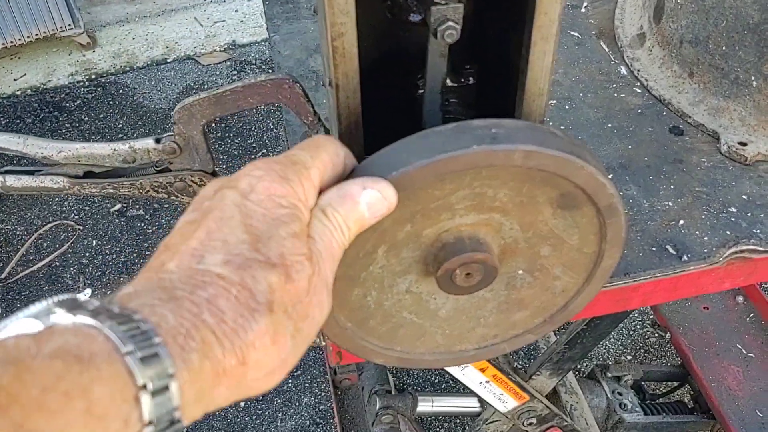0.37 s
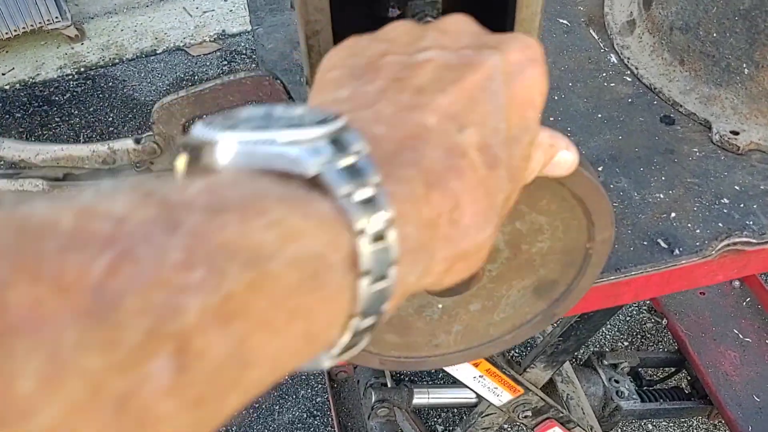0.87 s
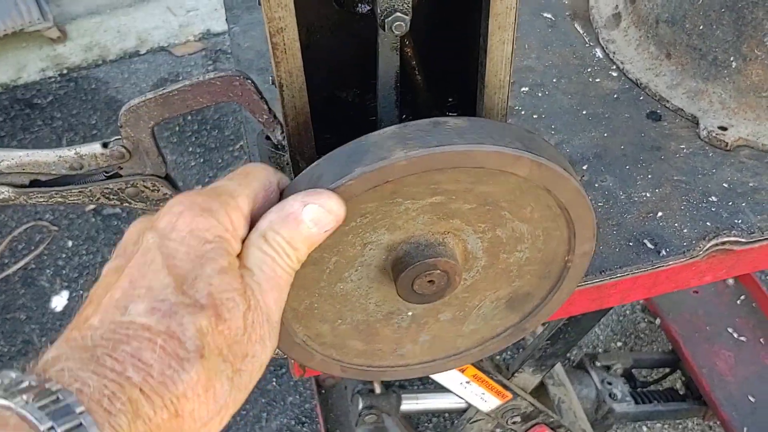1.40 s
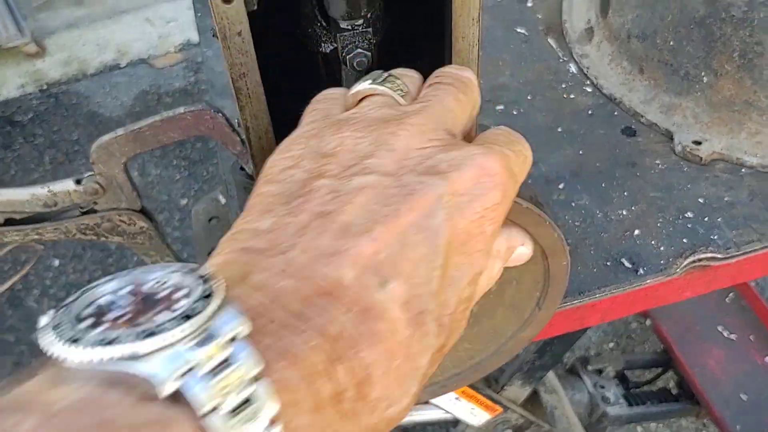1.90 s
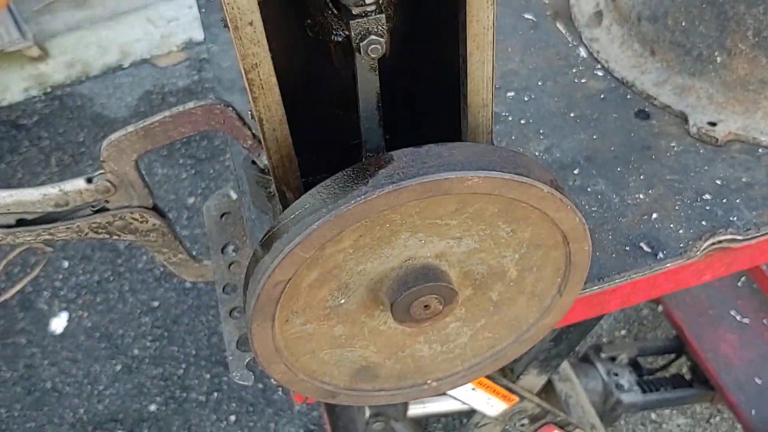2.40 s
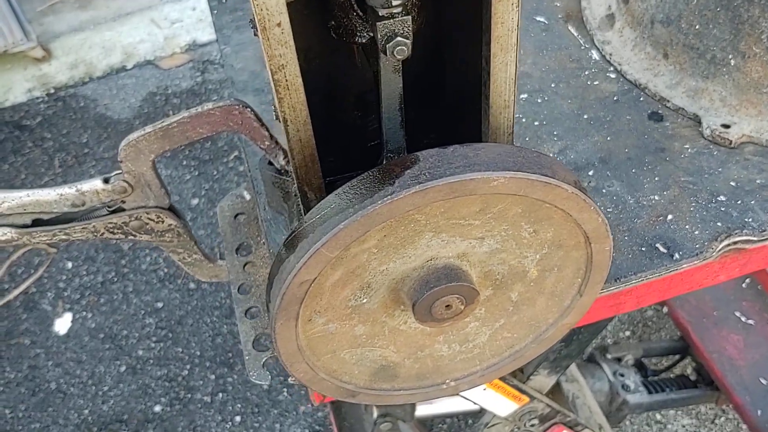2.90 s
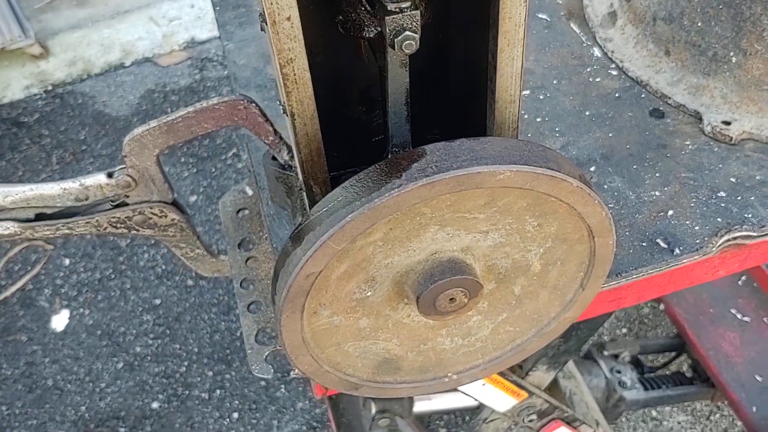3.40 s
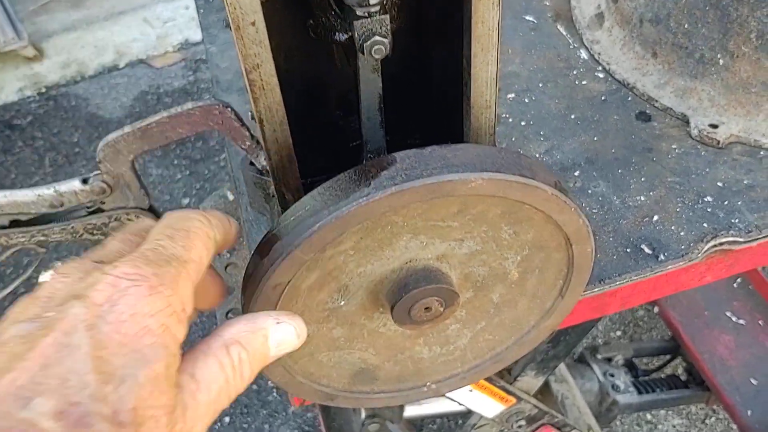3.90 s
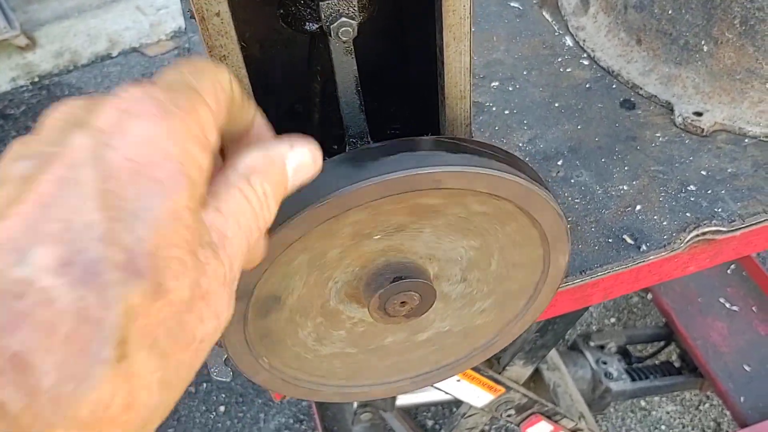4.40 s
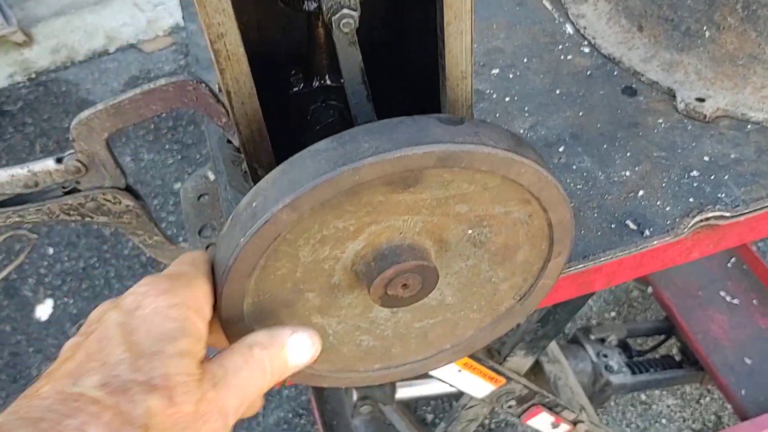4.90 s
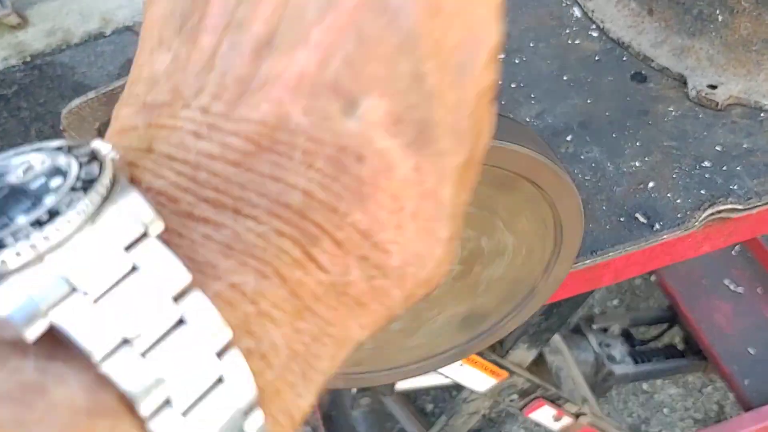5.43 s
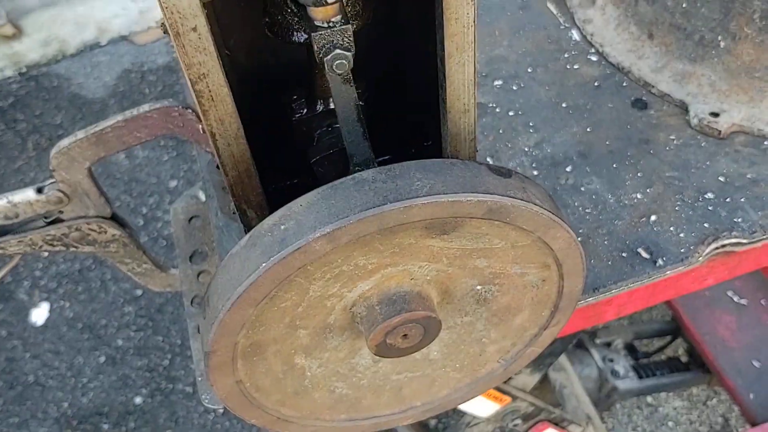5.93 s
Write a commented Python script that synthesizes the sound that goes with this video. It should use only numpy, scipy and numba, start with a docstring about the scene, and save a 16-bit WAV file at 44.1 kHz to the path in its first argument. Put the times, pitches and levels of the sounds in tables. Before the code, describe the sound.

Close up in an outdoor yard, a small piston engine leaks compressed air: a bright, thin, very high hiss runs throughout, fluttering slightly and swelling or easing as a hand rocks the flywheel. A faint, low machine hum and distant yard rumble sit far beneath. At about 1.6 s there is a short hollow tap. The hiss dips near 2.4 s, then little puffs come at 2.45, 2.6 and 2.8 s, with a soft dull bump. From 2.8 to 3.15 s the leak narrows into a breathy whistle. Around 3.18 s a thin squeal and sharp loud spit burst out with clustered linkage knocks and a tick. Air gushes from 3.3 to 3.57 s, its pitch sinking, followed by two quick puffs by 3.7 s. Steady hiss returns. Around 5.43 to 5.55 s come light knocks and a weaker squealing spit, then hiss surges briefly at 5.74 s and continues to 6 s.

```python
"""Outdoor yard: compressed air leaks from a small piston engine while a hand rocks its flywheel.
Jets are noise through resonances: steady leaks follow the valve flow; whistle and gush have a moving resonance.
Spits, puffs and squeals are short bursts of the same kind; knocks, taps and bumps are ringing modes.
A far machine hums as a sum of shaft orders over coloured yard noise.
The right microphone port faces the engine, the left lies in shadow."""
import sys
import numpy as np
from scipy import signal
from scipy.fft import rfft, irfft, next_fast_len
from scipy.io import wavfile
from numba import njit

SR = 44100
rng = np.random.default_rng(int(sys.argv[2]) if len(sys.argv) > 2 else 0)


def transcribe(u):
    """Save the signal u as a 16-bit wav file named by the first command-line argument.

    u: samples, shape (n,) or (channels, n), limited to [-1, 1]; the rate is SR.
    q: integer samples, one column per channel.
    """
    v = np.clip(np.atleast_2d(u).T, -1, 1)
    q = np.round(v * 32767).astype(np.int16)
    wavfile.write(sys.argv[1], SR, q)


def how_loud(loudness_db):
    """Turn decibels into a plain amplitude multiplier (0 dB gives 1, 20 dB gives 10)."""
    steps = np.asarray(loudness_db, float) / 20
    return 10 ** steps


N = 266805


def rms_one(x):
    """Scales both ports to unit rms at the right one."""
    return x / np.sqrt(np.mean(x[1] ** 2) + 1e-20)


def in_time(rows, outside=None):
    """Columns of a curve at every sample, interpolated linearly."""
    s, *columns = np.transpose(rows)
    return [np.interp(np.arange(N) / SR, s, c, outside, outside) for c in columns]


def at_hz(points, hz):
    """A spectrum read on a log-frequency axis."""
    point_hz, value = np.transpose(points)
    return np.interp(np.log(hz + 1), np.log(point_hz), value)


def drift(rate_hz):
    """Slow chance of spread 1: noise through two equal poles, made at SR / 40."""
    r = np.exp(-80 * np.pi * rate_hz / SR)
    noise = rng.standard_normal(N // 40 + 2002)
    slow = signal.lfilter([1], [1, -2 * r, r * r], noise)[2000:]
    return np.interp(np.arange(N) / 40, np.arange(len(slow)), slow / slow.std())


# Left port response. Each row: frequency in Hz, level in dB.
SHADOW = [(1000, 0.5), (1800, -1.5), (3500, -0.5), (7200, -0.5), (8600, -8), (9800, -25), (11400, -10),
          (12700, -18.5), (14100, -9), (15500, -7.5)]


def ports(x, left_db, lag_ms):
    """The left port is dulled by the housing; the right port hears a little later."""
    size = next_fast_len(N + 64)
    hz = np.fft.rfftfreq(size, 1 / SR)
    left_path = how_loud(at_hz(SHADOW, hz) + left_db)
    right_path = np.exp(-2j * np.pi * hz * lag_ms / 1000)
    return irfft(rfft(x, size) * [left_path, right_path], size)[:, :N]


# Yard spectrum. Each row: frequency in Hz, relative density in dB per Hz.
YARD = [(30, -11), (45, -15), (57, -1.5), (70, -5.5), (115, 2.2), (150, -1), (250, -1.5), (400, -4),
        (900, -7), (2000, -8.5), (3300, -3.5), (5400, -12.5), (7000, -61), (9000, -19)]
# Each row: frequency in Hz, left-right likeness from 0 to 1.
YARD_LIKENESS = [(50, 1), (160, 0.86), (400, 0.54), (1200, 0.9), (2400, 0.95), (3200, 0.97), (4500, 0.14),
                 (7000, 0.11)]
YARD_DB = -53


def yard():
    """Distant traffic and machinery: steady coloured noise, alike in both ports in the bass."""
    hz = np.fft.rfftfreq(N, 1 / SR)
    shared, own = rfft(rng.standard_normal((2, N)))
    alike = np.clip(at_hz(YARD_LIKENESS, hz), 0, 1)
    left = alike * shared + np.sqrt(1 - alike ** 2) * own
    pair = np.array([left, shared]) * how_loud(at_hz(YARD, hz))
    return how_loud(YARD_DB) * rms_one(ports(irfft(pair, N), left_db=-0.6, lag_ms=0.16))


# Far machine. Each row: time in seconds, second order in Hz, its rms in dB, brightness in dB per octave.
HUM = [(0, 166.6, -64.5, 2), (1.2, 165.6, -64, 2), (2.6, 165.3, -63.5, 1), (3.4, 165, -59.5, 1),
       (4.8, 164, -61.5, 0), (6.05, 163.4, -65, -2)]
# Each row: multiple of shaft speed, relative level in dB.
HUM_ORDERS = [(1, -8.5), (2, 0), (3, -17), (4, -5), (5, -13), (6, -7.5), (7, -19), (11.45, -17.5)]
HUM_WAVER_DB = 0.8


def hum():
    """Orders of a slowly sagging shaft speed, each wavering a little."""
    second_order_hz, level_db, bright_db = in_time(HUM)
    turns = np.cumsum(second_order_hz / 2) / SR
    out = 0
    for k, order_db in HUM_ORDERS:
        total_db = level_db + order_db + bright_db * np.log2(k / 2) + HUM_WAVER_DB * drift(1.0)
        out = out + np.sqrt(2) * how_loud(total_db) * np.sin(2 * np.pi * (k * turns + rng.random()))
    return out


def ring(s, peak_db, hz, t60_s):
    """Clicks at the given times set one damped mode ringing."""
    clicks = np.full(N, 1e-18)
    clicks[(s * SR).astype(int)] = how_loud(peak_db)
    r, w = how_loud(-60 / (t60_s * SR)), 2 * np.pi * hz / SR
    return signal.lfilter([.5, 0, -.5], [1, -2 * r * np.cos(w), r * r], clicks)


# Soft dull bumps. Each row: time in seconds, peak in dB before the band filter, mode in Hz.
BUMPS = [(2.75, -52, 556), (5.04, -63, 587), (5.63, -57, 595), (5.86, -57, 573)]
BUMP_T60_S, BUMP_CENTRE_HZ, BUMP_BAND_HZ = 0.22, 560, 250


def bumps():
    """A soft contact rings one low mode; a band filter takes off the click."""
    rings = sum(ring(np.array([s]), db, hz, BUMP_T60_S) for s, db, hz in BUMPS)
    edges_hz = [BUMP_CENTRE_HZ - BUMP_BAND_HZ / 2, BUMP_CENTRE_HZ + BUMP_BAND_HZ / 2]
    return signal.sosfilt(signal.butter(2, edges_hz, "band", fs=SR, output="sos"), rings)


# Short hollow taps of one pitch. Each row: start in seconds, envelope peak in dB, pitch in Hz.
TAPS = [(1.6291, -31.5, 1100), (1.6325, -32, 664), (1.6364, -37, 640)]
TAP_RISE_S = .0008


def taps():
    """A padded contact: a few cycles that swell and die."""
    out, since_s = np.zeros(N), np.arange(600) / SR
    swell = since_s / TAP_RISE_S * np.exp(1 - since_s / TAP_RISE_S)
    for s, db, hz in TAPS:
        out[int(s * SR):][:len(since_s)] += how_loud(db) * swell * np.sin(2 * np.pi * hz * since_s)
    return ports(np.array([out, out]), left_db=-2.5, lag_ms=0.064)


# Linkage knocks. Each row: time in seconds, strength in dB, tilt in dB per octave below 1100 Hz, thump in dB.
KNOCKS = [(1.6296, -45.5, -5, -68), (3.177, -49, -8, -66), (3.190, -44, -5, -73), (3.2012, -46, -2, -47),
          (3.2035, -47, -3, -60), (3.208, -44, 0, -75), (3.222, -53, 0, -68), (5.433, -50, 0.5, -60),
          (5.55, -48, 1, -50)]
# Frame modes. Each row: frequency in Hz, relative level in dB, t60 in seconds.
FRAME = [(483, 1, 0.044), (556, -6, 0.099), (710, 5, 0.016), (870, 3.5, 0.013), (1096, 3.5, 0.035),
         (1335, -10, 0.024), (1670, 4.5, 0.03), (2240, 2, 0.028), (2660, 9, 0.011), (3870, -2, 0.011)]
# Valve plate modes. Each row: frequency in Hz, relative level in dB, t60 in seconds.
PLATE = [(10200, -2, .012), (11400, -6, .008), (12400, 0, .012)]
THUMP_HZ, THUMP_T60_S = 115, 0.18  # the bench
TICK_S, TICK_DB = 3.1990, -12  # the valve plate snaps onto its seat


def knocks():
    """Each knock strikes the frame modes by chance strengths and thumps the bench; the plate ticks once."""
    s, strength_db, tilt_db, thump_db = np.transpose(KNOCKS)
    luck_db = rng.normal(0, 2.5, (len(s), len(FRAME)))
    out = ring(s, thump_db, THUMP_HZ, THUMP_T60_S)
    for k, (hz, mode_db, t60_s) in enumerate(FRAME):
        peak_db = strength_db + mode_db - 7.5 + tilt_db * np.log2(1100 / hz) + luck_db[:, k]
        out += ring(s, peak_db, hz, t60_s)
    for hz, mode_db, t60_s in PLATE:
        out += ring(np.array([TICK_S]), TICK_DB + mode_db, hz, t60_s)
    return ports(np.array([out, out]), left_db=1.1, lag_ms=0.12)


LEAK_ALIKE, SPIT_ALIKE = .84, .85  # left-right likeness of the noise


def turbulence(alike):
    """Noise for the two ports, partly shared."""
    shared, own = rng.standard_normal((2, N))
    alike = np.clip(alike, 0, 1)
    return np.array([alike * shared + np.sqrt(1 - alike ** 2) * own, shared])


def resonate(x, modes, flutter_db):
    """Parallel resonances, each applied twice for dark valleys, with its own eddies and wavering."""
    out = 0
    for k, (hz, width_hz, level_db) in enumerate(modes):
        r = np.exp(-np.pi * 1.5 * width_hz / SR)  # widened, as two passes narrow it
        section = [(1 - r * r) / 2, 0, (r * r - 1) / 2, 1, -2 * r * np.cos(2 * np.pi * hz / SR), r * r]
        waver_db = flutter_db * drift(2.5)
        eddies = np.roll(x, 5000 * k, axis=1)
        out = out + how_loud(level_db + waver_db) * signal.sosfilt([section, section], eddies)
    return out


def jet(modes, level_db, alike, flutter_db, left_db, lag_ms):
    """Turbulent air through a set of resonances; the flow itself is unsteady."""
    air = rms_one(ports(resonate(turbulence(alike), modes, flutter_db), left_db, lag_ms))
    return how_loud(level_db + .5 * drift(38.0)) * air


QUIET_DB = -35  # where a burst begins and ends, relative to its level


def burst(start_s, stop_s, attack_s, release_s, db, swell_db):
    """Level in dB: attack, a hold that changes by swell_db, release."""
    end_db = db + swell_db
    return in_time([(start_s - attack_s, db + QUIET_DB), (start_s, db),
                    (stop_s, end_db), (stop_s + release_s, end_db + QUIET_DB)], -120)[0]


# The port cracks open for a moment. Each row: start of hold in seconds, hold in seconds, level in dB.
PUFFS = [(2.45, 0.043, -32), (2.614, 0.064, -30), (2.776, .03, -33), (3.622, 0.02, -27),
         (3.661, 0.015, -24.5), (3.765, 0.033, -36)]
# Middle passages. Each row: frequency in Hz, width in Hz, relative level in dB.
PUFF = [(10130, 490, -1.5), (10930, 440, 1.5), (11240, 640, -2)]
PUFF_ATTACK_S, PUFF_RELEASE_S = 0.04, 0.044


def puffs():
    """Short puffs of air through the middle passages."""
    bursts_db = [burst(s, s + hold_s, PUFF_ATTACK_S, PUFF_RELEASE_S, db, 1.9) for s, hold_s, db in PUFFS]
    return jet(PUFF, np.max(bursts_db, axis=0), LEAK_ALIKE, flutter_db=4.5, left_db=-6.0, lag_ms=0.19)


# Each row: start of hold in seconds, stop in seconds, level in dB, pitch in Hz, width in Hz, right lag in ms.
SQUEALS = [(3.162, 3.17, -48, 2550, 250, .15), (3.161, 3.186, -43, 3820, 70, .131),
           (5.541, 5.562, -40, 2720, 200, .184)]
SQUEAL_ATTACK_S, SQUEAL_RELEASE_S, SQUEAL_ALIKE = 0.011, 0.022, .96


def squeals():
    """The seal squeals thinly around each spit: noise through one narrow resonance."""
    out = 0
    for start_s, stop_s, db, hz, width_hz, lag_ms in SQUEALS:
        level_db = burst(start_s, stop_s, SQUEAL_ATTACK_S, SQUEAL_RELEASE_S, db, -1.8)
        out = out + jet([(hz, width_hz, 0)], level_db, SQUEAL_ALIKE, flutter_db=2, left_db=-1.5, lag_ms=lag_ms)
    return out


# The seal lets go. Each row: start of hold in seconds, build-up in seconds, hold in seconds,
# high part in dB, its pitch in Hz, low part in dB.
SPITS = [(3.182, 0.022, .012, -18, 8600, -33.5), (5.54, 0.02, .008, -26, 9700, -38.5)]
# Each row: frequency in Hz, width in Hz, relative level in dB.
SPIT_LOW = [(1110, 120, -7), (1770, 500, -8), (2550, 440, 1.5), (3900, 700, 0.3), (5000, 1500, -4)]
# Each row: multiple of the pitch, width in Hz, relative level in dB.
SPIT_HIGH = [(1, 400, 0), (1.17, 600, -7)]
SPIT_HIGH_RELEASE_S, SPIT_LOW_RELEASE_S, SPIT_LOW_LAG_S = 0.012, 0.045, 0.004


def spits():
    """Short bursts with a high part and a low part that comes a little later and lasts longer."""
    out, lows_db = 0, []
    for s, rise_s, hold_s, high_db, pitch_hz, low_db in SPITS:
        low_s = s + SPIT_LOW_LAG_S
        lows_db.append(burst(low_s, low_s + 1.5 * hold_s, rise_s, SPIT_LOW_RELEASE_S, low_db, -1.0))
        modes = [(k * pitch_hz, width_hz, db) for k, width_hz, db in SPIT_HIGH]
        level_db = burst(s, s + hold_s, rise_s, SPIT_HIGH_RELEASE_S, high_db, 0.3)
        out = out + jet(modes, level_db, SPIT_ALIKE, flutter_db=1, left_db=-7.0, lag_ms=0.197)
    return out + jet(SPIT_LOW, np.max(lows_db, axis=0), SPIT_ALIKE, flutter_db=1, left_db=0.5, lag_ms=0.15)


@njit
def sliding_resonance(x, hz, r, rate):
    """A two-pole resonance with a moving centre."""
    y = np.zeros_like(x)
    for c in range(x.shape[0]):
        for i in range(2, x.shape[1]):
            feedback = 2 * r * np.cos(2 * np.pi * hz[i] / rate) * y[c, i - 1] - r * r * y[c, i - 2]
            y[c, i] = x[c, i] - x[c, i - 2] + feedback
    return y


def sliding_jet(hz, pole_width_hz, passages, level_db, left_db, lag_ms):
    """A jet with one moving resonance, applied twice, beside fixed passage resonances."""
    r = np.exp(-np.pi * pole_width_hz / SR)
    once = sliding_resonance(turbulence(LEAK_ALIKE), hz, r, SR)
    moving = sliding_resonance(once, hz, r, SR) * ((1 - r * r) / 2) ** 2
    still = resonate(turbulence(LEAK_ALIKE), passages, 0.9)
    return how_loud(level_db) * rms_one(ports(moving + still, left_db, lag_ms))


# Pressure builds behind the nearly shut port: swell and sag. Each row: time in seconds, level in dB.
WHISTLE = [(2.70, -70), (2.735, -41), (2.80, -36), (3.0, -33.5), (3.1, -33), (3.3, -30), (3.345, -41),
           (3.6, -47), (3.9, -76)]
# Each row: frequency in Hz, width in Hz, relative level in dB.
WHISTLING = [(1500, 900, -30), (2270, 170, -15.5), (4500, 600, -28), (5500, 700, -20), (6480, 260, -4),
             (7350, 350, -14)]
WHISTLE_HZ, WHISTLE_LOWEST_HZ = 6980, 6560
WHISTLE_SAG_START_S, WHISTLE_SAG_HZ_PER_S = 2.73, 750


def whistle():
    """A narrow band of hiss while the port is nearly shut; it lingers faintly under the gush."""
    level_db = in_time(WHISTLE, -120)[0] + 1.2 * drift(14.0)
    sag_hz = WHISTLE_SAG_HZ_PER_S * (np.arange(N) / SR - WHISTLE_SAG_START_S)
    hz = np.clip(WHISTLE_HZ - sag_hz, WHISTLE_LOWEST_HZ, WHISTLE_HZ)
    return sliding_jet(hz, 600, WHISTLING, level_db, left_db=-3.0, lag_ms=0.14)


# Port opens, air gushes. Each row: time in seconds, level in dB.
GUSH = [(3.275, -55), (3.32, -20.5), (3.45, -20.5), (3.505, -17), (3.56, -22), (3.6, -35), (3.7, -56)]
# Fixed passages. Each row: frequency in Hz, width in Hz, relative level in dB.
GUSH_LOW = [(1500, 1200, -36), (2200, 140, -24), (4500, 260, -18.5), (5600, 500, -25.5), (6020, 560, -18.5),
            (7100, 1240, -14.5), (8600, 540, -17), (9880, 620, -1), (10420, 510, 1), (11200, 480, 2)]
GUSH_REF_S, GUSH_REF_HZ, GUSH_SINK_HZ_PER_S = 3.31, 14200, 13500  # upper resonance


def gush():
    """The upper resonance of the jet sinks as the port widens."""
    sink_hz = GUSH_SINK_HZ_PER_S * (np.arange(N) / SR - GUSH_REF_S)
    hz = np.clip(GUSH_REF_HZ - sink_hz, 9600, 14500)
    level_db, = in_time(GUSH, -120)
    return sliding_jet(hz, 1900, GUSH_LOW, level_db, left_db=0.5, lag_ms=0.16)


# Air flow through the valve. Each row: time in seconds, flow level in dB.
FLOW = [(0, -27.5), (.6, -30.5), (1.0, -27), (1.6, -26), (2.0, -25), (2.32, -25), (2.39, -31.5),
        (2.47, -26), (2.545, -27), (2.585, -24), (2.67, -26), (2.72, -24), (2.8, -28), (3.1, -33),
        (3.23, -31), (3.3, -26.5), (3.45, -28.5), (3.585, -28.5), (3.63, -22.5), (3.655, -27), (3.68, -28),
        (3.72, -29), (3.78, -26.5), (3.9, -26), (4.3, -27), (4.52, -29.5), (4.6, -24.5), (5.0, -26),
        (5.3, -26.5), (5.43, -30), (5.6, -24.5), (5.68, -28), (5.74, -22), (6.05, -26.5)]
# Leak levels at mean flow. Each row: time in seconds, gland in dB, its lowest resonances in dB,
# top of the valve face in dB, exhaust passage in dB, low slot tone in dB, high slot tone in dB.
COLOUR = [(0, -26, -46.5, -34, -50, -54, -53), (.6, -27, -43, -26, -45.5, -32.5, -39),
          (1.2, -31, -44, -27.5, -44.5, -31.5, -36), (2.0, -31, -49, -30, -42, -42, -29),
          (2.6, -32, -51.5, -28, -45.5, -43, -38), (2.75, -34.5, -37, -28, -43.5, -43, -40),
          (3.25, -26.5, -37, -25, -36, -51, -50), (3.4, -32.5, -36, -29, -38.5, -50, -50),
          (3.56, -34, -43, -29, -36, -43, -50), (3.66, -33, -41.5, -24, -42, -36, -49),
          (3.8, -31.5, -46, -28.5, -43, -45, -52), (4.4, -31, -49, -29, -41, -47, -49),
          (5.2, -33.5, -49, -29, -41, -41, -57), (6.05, -31.5, -47, -28, -39.5, -40, -29)]
# Resonances of each leak. Each row: frequency in Hz, width in Hz, relative level in dB.
GLAND = [(7490, 920, -13.5), (8270, 720, -6.5), (9320, 500, 1), (10300, 690, 0.5), (11310, 590, -4.5),
         (11900, 1500, -4)]
GLAND_LOWEST = [(6300, 257, -2), (7060, 650, -1)]
VALVE_FACE = [(12490, 1000, -1), (12920, 730, -1.5), (13200, 1000, -5), (14040, 1400, -3.5)]
FACE_TOP = [(15030, 660, -1.4), (15500, 620, -1.1)]
EXHAUST = [(3130, 550, -18.5), (4120, 1860, -23.5), (8800, 386, 2)]
SLOT = [(11250, 400, -2), (14250, 380, 0)]
GLAND_DB_PER_FLOW_DB, TONES_DB_PER_FLOW_DB = 0.23, 0.73
FACE_BODY_DB = -1.5  # lower valve-face resonances against the flow level


def leaks():
    """Broad leaks and narrow tones sound all the time and follow the flow."""
    flow_db, = in_time(FLOW)
    swing_db = flow_db - flow_db.mean()
    gland_db, lowest_db, top_db, exhaust_db, low_db, high_db = in_time(COLOUR)
    gland_swing_db, tone_swing_db = GLAND_DB_PER_FLOW_DB * swing_db, TONES_DB_PER_FLOW_DB * swing_db
    # resonances, level in dB, flutter in dB, left level in dB, right lag in ms
    parts = [(GLAND, gland_db + gland_swing_db, 2.08, -1.1, .17),
             (GLAND_LOWEST, lowest_db + gland_swing_db, 2.5, -2.0, 0.19),
             (VALVE_FACE, flow_db + FACE_BODY_DB, 1.9, -0.5, 0.2155),
             (FACE_TOP, top_db + swing_db, 0.2, -1.2, 0.224),
             (EXHAUST, exhaust_db + tone_swing_db, 2.0, -0.04, 0.25),
             (SLOT[:1], low_db + tone_swing_db, 1.0, -1.5, 0.193),
             (SLOT[1:], high_db + tone_swing_db, 1.5, -33.0, 0.227)]
    return sum(jet(modes, level_db, LEAK_ALIKE, flutter_db, left_db, lag_ms)
               for modes, level_db, flutter_db, left_db, lag_ms in parts)


# Added level of all jets at the left port. Each row: time in seconds, level in dB.
LEFT_LEVEL = [(0, 0.5), (2.3, 2), (2.5, -2), (3, -1), (3.6, -2), (3.8, 2.5), (5, 3), (6.05, 3.5)]


def scene():
    """Engine close on the right, yard all round."""
    left, right = leaks() + spits() + whistle() + gush() + puffs() + squeals()
    jets = np.array([left * how_loud(in_time(LEFT_LEVEL)[0]), right])
    return jets + knocks() + taps() + bumps() + hum() + yard()


def band_limit(x):
    """A steep low-pass at the top of the band."""
    return signal.sosfilt(signal.butter(12, 17070, fs=SR, output="sos"), x)


def record(dry):
    """The bass rolls off below 45 Hz and the top is cut steeply at 15680 Hz."""
    bass_cut = signal.butter(2, 45, "high", fs=SR, output="sos")
    top_cut = signal.ellip(14, .5, 70, 15680, fs=SR, output="sos")
    mix = signal.sosfilt(np.vstack([bass_cut, top_cut]), dry)
    return band_limit(mix)


dry = scene()
out = record(dry)
transcribe(out)
```